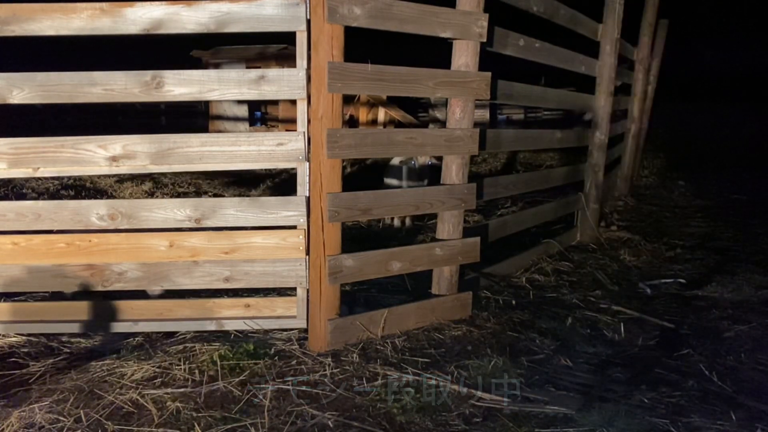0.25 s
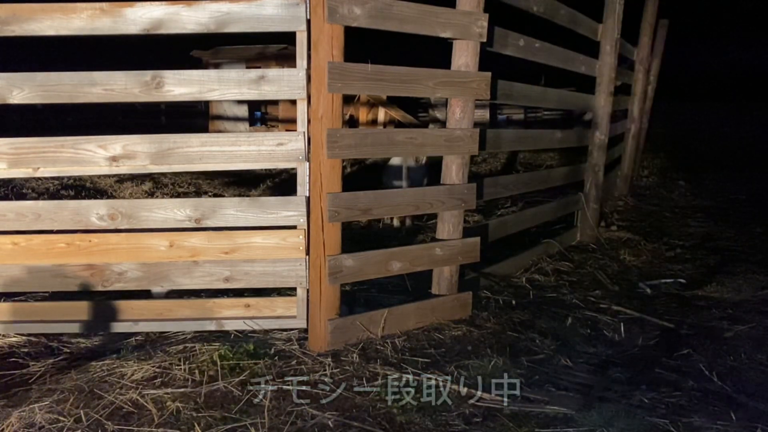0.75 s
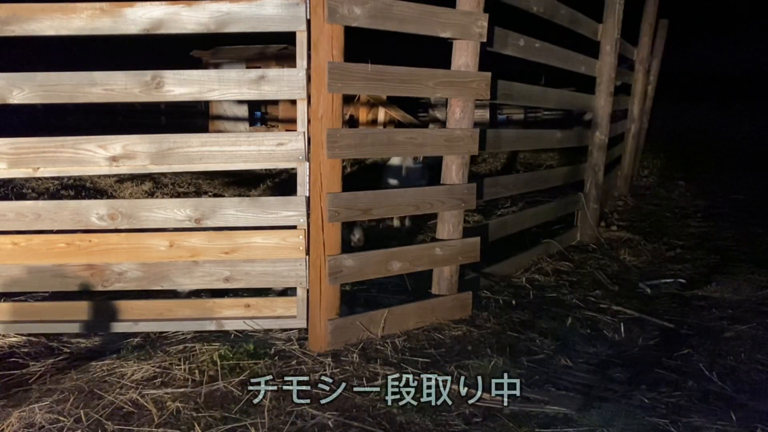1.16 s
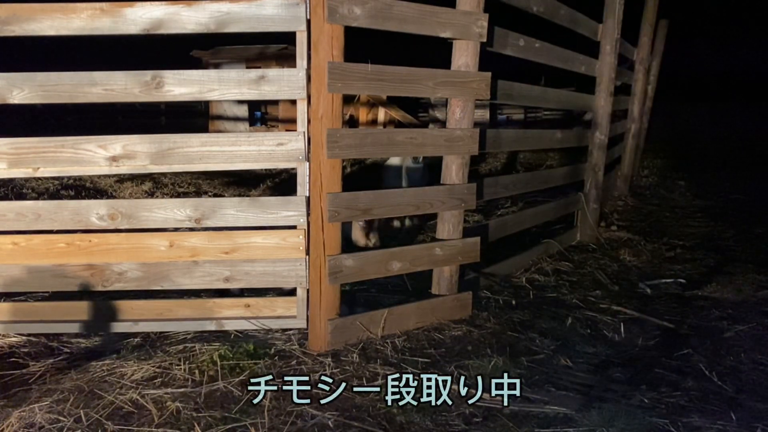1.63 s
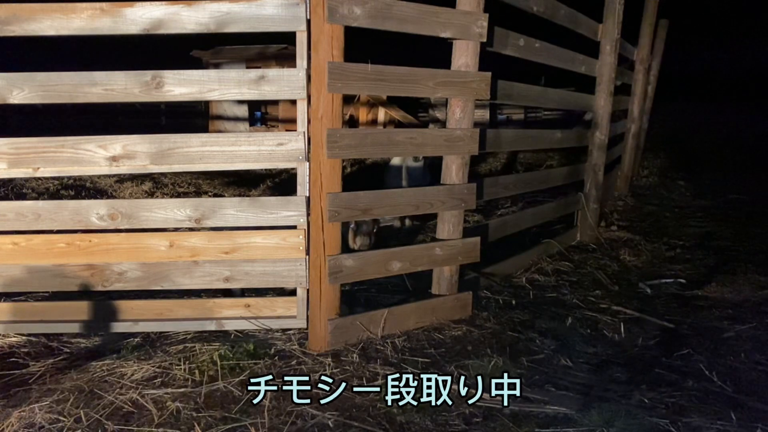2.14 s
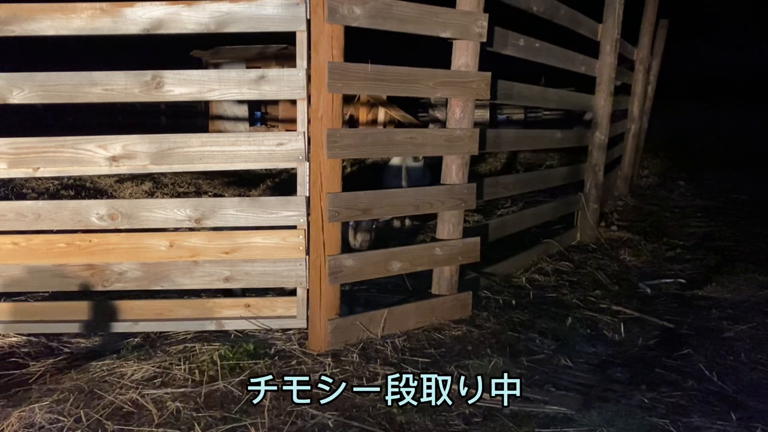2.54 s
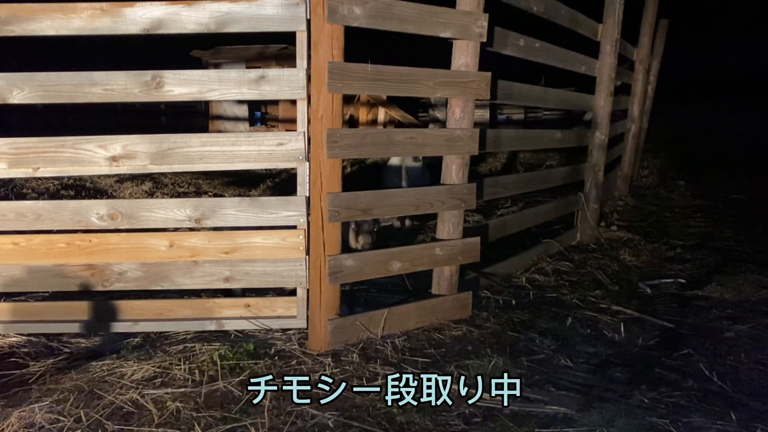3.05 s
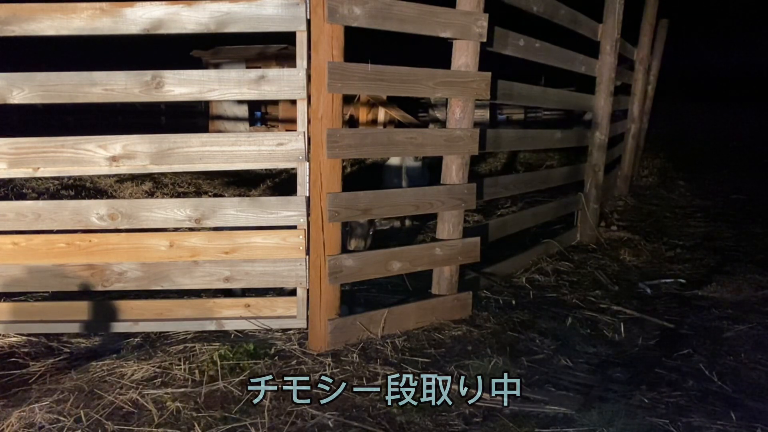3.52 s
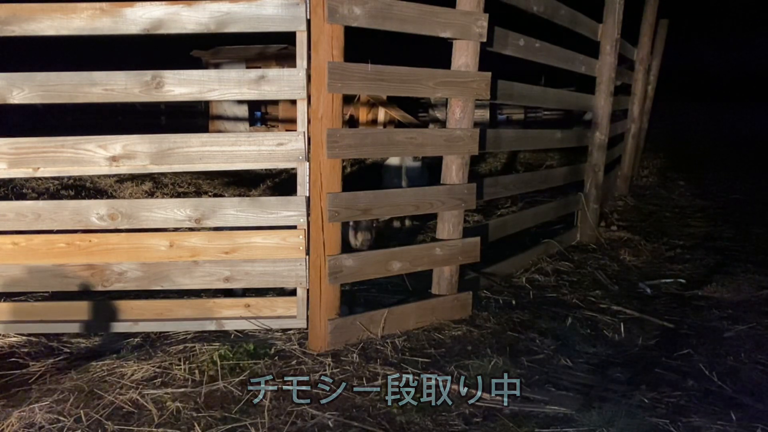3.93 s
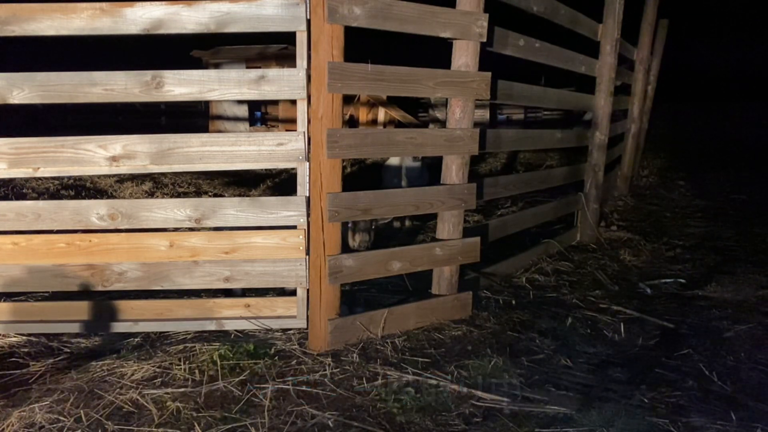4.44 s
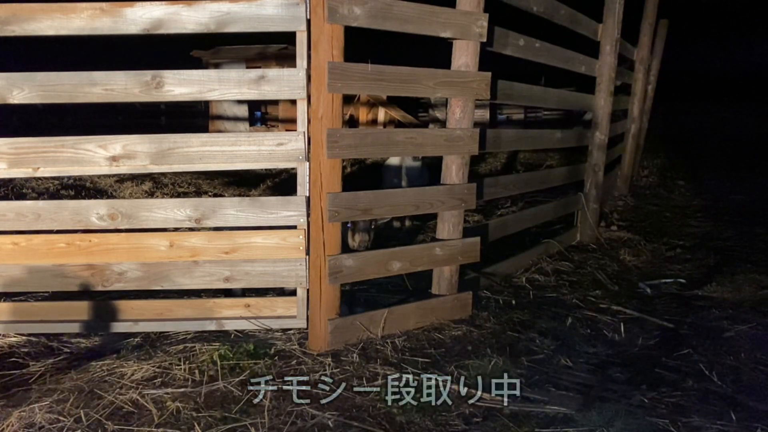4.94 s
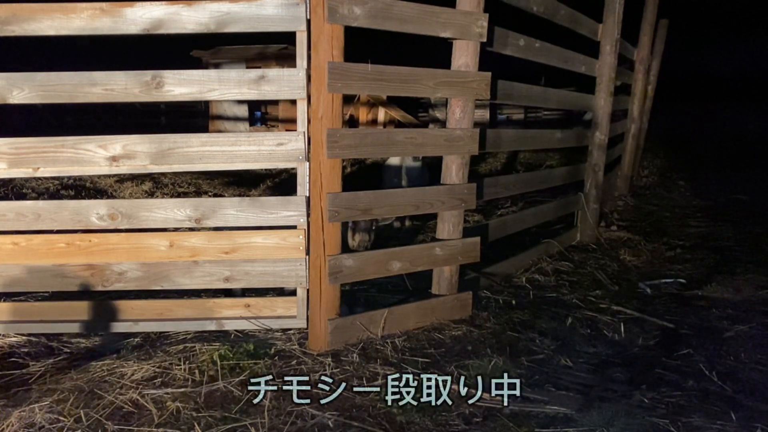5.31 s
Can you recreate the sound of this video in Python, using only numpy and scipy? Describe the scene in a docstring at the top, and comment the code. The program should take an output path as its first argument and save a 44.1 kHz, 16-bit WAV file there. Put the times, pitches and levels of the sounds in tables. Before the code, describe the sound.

A goat gives one short, loud, level bleat, then a softer quavering one, over a low engine hum and faint straw rustle.

```python
"""Open wooden goat pen at night: one loud, level bleat that sags at its end, then a softer quavering one,
nine throbs after a faint first push. Voices are vocal-fold harmonics and puffed noise shaped by a throat.
Straw under the animals is coloured noise with fine crackle; breaking stalks add cracks and dull knocks.
A far engine is a sum of cycle orders, over a bed of night air. Two close microphone ports pick it up."""
import sys
import numpy as np
from scipy import signal
from scipy.fft import rfft, irfft
from scipy.io import wavfile
from scipy.ndimage import uniform_filter1d, map_coordinates

SR = 44100
rng = np.random.default_rng(int(sys.argv[2]) if len(sys.argv) > 2 else 0)


def log_audio(samples):
    """Write samples as a 16-bit WAV file to the path given in sys.argv[1]."""
    # one column per channel
    frames = np.atleast_2d(samples).T
    # limit to full scale, then quantise
    limited = np.clip(frames, -1, 1)
    pcm = np.round(limited * 32767).astype(np.int16)
    wavfile.write(sys.argv[1], SR, pcm)


N = 246078
T = np.arange(N) / SR
EDGE_HZ = 15900  # upper band limit of harmonics and ports

# likeness of the noise at the two ports: (frequency [Hz], left-right correlation [-1 to 1])
AIR_SAME = [(60, 0.95), (200, 0.62), (400, 0.2), (700, 0.057), (1500, 0.6), (3000, 0.15), (7000, 0.65),
            (15000, 1)]


def gain_of(db):
    """Decibels to an amplitude factor."""
    return 10 ** (np.asarray(db) / 20)


def evened(x):
    """Scales to an rms of one."""
    return x / np.sqrt(np.mean(x ** 2) + 1e-20)


def read(points, hz):
    """Reads a spectrum on a log-frequency axis."""
    f, value = np.transpose(sorted(map(tuple, points)))
    return np.interp(np.log(hz + 1), np.log(f + 1), value)


def add(mix, s, sound):
    """Mixes a sound in at a time in seconds."""
    part = mix[max(round(s * SR), 0):][:len(sound)]
    part += sound[:len(part)]


def coloured(x, points):
    """Filters x by a gain curve in dB."""
    hz = np.fft.rfftfreq(x.shape[-1], 1 / SR)
    return irfft(rfft(x) * gain_of(read(points, hz)), x.shape[-1])


def leaned(pair, lean):
    """Tips a pair to the left or right, band by band."""
    return np.array([coloured(x, [(f, side * db / 2) for f, db in lean]) for x, side in zip(pair, (1, -1))])


def drift(size, hz):
    """Smooth random curve of about unit size, varying up to a rate."""
    knots = rng.standard_normal(4096)
    return map_coordinates(knots, [np.arange(size) * 2 * hz / SR], order=3, mode="wrap")


def port_pair(same):
    """Two noises, alike by a spectrum of likeness."""
    a, b = rfft(rng.standard_normal((2, N)))
    c = np.clip(read(same, np.fft.rfftfreq(N, 1 / SR)), -1, 1)
    return irfft(np.array([a, c * a + np.sqrt(1 - c ** 2) * b]), N)


def night_air(level_db=-55):
    """A low rumble and a faint wash: coloured noise that leans left or right by band."""
    # air spectrum: (frequency [Hz], density [dB per Hz])
    air_colour = [(20, -29), (42, 0), (60, -0.5), (110, -5.5), (200, -6.5), (250, -16), (375, -10),
                  (560, -20), (860, -17.5), (1100, -26.5), (1750, -19), (2800, -35.5), (6000, -44),
                  (15000, -61)]
    # side balance: (frequency [Hz], left minus right [dB])
    air_lean = [(100, 0.5), (500, 7.5), (900, -0.5), (1300, -4), (1900, -5), (3300, -7.5), (5000, 0.5),
                (9000, 3.5)]
    wash = coloured(port_pair(AIR_SAME), air_colour)
    return gain_of(level_db) * evened(leaned(wash, air_lean))


def straw(per_s=700, spread_db=4.0, crackle=0.59, catch_db=1):
    """A hiss of rubbing stalks that catch and slip, with random grains as fine crackle."""
    # rustle before the catch-and-slip drift: (time [s], level [dB])
    rustle = [(0.0, -62), (0.58, -64), (0.92, -70.5), (1.1, -74.5), (1.54, -68.5), (2.6, -66.5),
              (3.02, -70.5), (3.44, -65), (3.61, -58), (3.8, -65), (4.14, -65.5), (4.44, -61.5),
              (4.74, -70.5), (5.16, -74), (5.32, -59.5), (5.56, -61)]
    # straw spectrum: (frequency [Hz], density [dB per Hz])
    straw_colour = [(200, -12), (700, -2.5), (1500, 3.5), (2700, -6), (3800, 2.5), (6300, -1), (7300, -7),
                    (9000, -16), (12000, -14), (14500, -23.5), (15800, -35)]
    db = np.interp(T, *np.transpose(rustle)) + catch_db * drift(N, 22)
    hits = (rng.random(N) < per_s / SR) * rng.choice([-1, 1], N)
    grains = hits * gain_of(spread_db * np.minimum(rng.exponential(1, N), 5))
    sound = port_pair(AIR_SAME) + crackle * evened(grains)
    return gain_of(db) * evened(coloured(sound, straw_colour))


def engine(waver=0.0015, flutter=0.14):
    """Orders of a four-stroke cycle (two turns), settling to idle; the strong pair beats at the firing rate."""
    # engine orders at idle: (multiple of the cycle rate, rms level [dB])
    orders = [(6, -74), (9, -67.5), (12, -74), (15, -73), (18, -78.5), (21, -58.5), (22, -64), (23, -84),
              (24, -58.5), (25, -72.5), (26, -74), (45, -74), (53, -70.5)]
    idle_rpm, rev_rpm, rev_db, settle_s = 984, 68.4, 3.5, .48
    rev = np.exp(-(T / settle_s) ** 2)
    cycle_hz = (idle_rpm + rev_rpm * rev) / 120
    cycles = np.cumsum(cycle_hz * (1 + waver * drift(N, 2.98))) / SR
    out = np.zeros(N)
    for order, db in orders:
        strength = gain_of(db) * (1 + flutter * drift(N, 1.217))
        out += strength * np.sin(2 * np.pi * (round(order) * cycles + rng.random()))
    return gain_of(rev_db * rev) * np.sqrt(2) * out


def folds(hz, throat, jitter, spread):
    """Harmonics of the vocal folds, each weighted by the throat, at an even level; also the cycle count."""
    turns = np.cumsum(hz * (1 + jitter * drift(len(hz), 220))) / SR
    k = np.arange(1, 52)[:, None]
    weight = gain_of(throat(k * hz)) * (k * hz < EDGE_HZ)
    # phases spread by harmonic number plus a random part, so the tone is less peaky in each cycle
    phase = spread * k ** 2 + rng.normal(0, 0.72, k.shape)
    tone = (weight * np.cos(2 * np.pi * k * turns + phase)).sum(0)
    return tone / np.sqrt(uniform_filter1d(tone ** 2, size=440)), turns


def puffs(turns, steady):
    """Air noise that bursts once in every cycle, over a steady share."""
    return (steady + np.exp(-(turns % 1) / 0.33)) * rng.standard_normal(len(turns))


def loud_bleat(noise_db=-4.5, spread=.3):
    """A clean held note with a slow waver; as the mouth closes the pitch sags and the voice roughens."""
    # throat at four mouth positions, and the thin top they share: (frequency [Hz], gain [dB])
    early, wide = [(400, -9), (800, -24), (1210, -6), (1610, -1.5), (2010, -5), (2410, 2), (2810, -13.5),
                   (3220, -1.5), (3620, -26.5), (4020, -8.5), (4820, -22), (5220, -15.5), (6030, -29.5),
                   (6830, -25)], [(400, -9.5), (810, -13.5), (1210, -3.5), (2010, -7), (2420, -6),
                                  (2820, -14), (3220, 2), (3630, -5.5), (4030, -9), (4430, -24),
                                  (5240, -9.5), (5640, -33.5), (6040, -20), (6850, -36.5)]
    turning, closing = [(365, -9), (740, -29), (1100, -2.5), (1480, -7.5), (1850, -14), (2250, -0.5),
                        (2750, -23.5), (3150, -2), (3520, 0), (4000, -14), (4400, -18.5), (5300, -19),
                        (6800, -29)], [(320, -12), (650, -9), (970, -5.5), (1290, -5), (1620, 3),
                                         (1940, -28), (2260, -10), (2590, -20), (2910, -27), (3240, -9),
                                         (3560, -3), (4210, -15.5), (5180, -21.5), (6790, -29)]
    sheen = [(7300, -39.5), (8100, -50.5), (10000, -57.5), (11700, -46.5), (13400, -46), (14900, -40),
             (15800, -56)]
    # mouth: (time [s], position [0 early, 1 wide, 2 turning, 3 closing])
    mouth_path = [(.09, 0), (.175, 0.3), (.302, 1), (.326, 2), (.342, 2), (.351, 2.5)]
    start_s, stop_s, held_db = 0.048, 0.3715, -25.5
    attack_s, release_db_per_s = 0.014, 848
    held_hz, waver_hz, waver_period_s = 401.56, 1.98, .22
    sag_at_s, sag_ease_s, sag_hz, sag_db = .3465, 0.01097, 106.3, -3
    rough_held, rough_sag = .013, .11  # 0-1; the sag adds the second
    jitter_at_full_rough = .07  # share of pitch

    t = np.arange(start_s, stop_s + 0.064, 1 / SR)
    sag = 1 / (1 + np.exp((sag_at_s - t) / sag_ease_s))
    waver = waver_hz * np.cos(2 * np.pi * (t - t[0] - attack_s) / waver_period_s)
    hz = held_hz + waver - sag_hz * sag
    db = held_db + sag_db * sag - release_db_per_s * np.maximum(t - stop_s, 0)
    attack = np.minimum((t - t[0]) / attack_s, 1)
    rough = rough_held + rough_sag * sag

    mouth = np.interp(t, *np.transpose(mouth_path))
    throats = [list(shape) + list(sheen) for shape in (early, wide, turning, closing)]
    shares = [np.interp(mouth, range(len(throats)), row) for row in np.eye(len(throats))]

    def throat(f):
        """Throat gain in dB, blended between mouth positions."""
        return sum(w * read(p, f) for w, p in zip(shares, throats))

    tone, turns = folds(hz, throat, jitter_at_full_rough * rough, spread)
    air = puffs(turns, steady=.3)
    air = sum(w * evened(coloured(air, p)) for w, p in zip(shares, throats))
    voice = tone + gain_of(noise_db) * rough * air
    return t[0], attack * gain_of(db) * voice * signal.windows.tukey(len(t), .02)


def pen(x, wet_db):
    """A few echoes off ground and fence, then a faint tail from the shed and yard."""
    # tail decay: (frequency [Hz], t60 [s])
    tail_t60 = [(200, 0.9), (1000, 1.85), (2400, 1.36), (3200, 0.68), (4000, 0.83), (8000, 0.7),
                (15000, 0.5)]
    # tail colour: (frequency [Hz], gain [dB])
    tail_colour = [(300, -3.5), (1600, -10), (2400, 1.5), (2800, 14), (3200, 1.5), (3650, -5.5),
                   (5000, -0.5), (12000, -1.5)]
    # early echoes: (delay [s], level [dB])
    boards = [(.0043, -37.5), (.0091, -23), (0.0174, -32), (0.026, -28.5)]
    taps = rng.standard_normal((2, SR)) * (rng.random((2, SR)) < .1)
    hz, t, z = signal.stft(taps, SR, nperseg=256)
    decay_db = -60 * t / read(tail_t60, hz)[:, None]
    z = z * gain_of(read(tail_colour, hz)[:, None] + decay_db) * np.minimum(t / 0.014, 1)
    tail = signal.istft(z, SR, nperseg=256)[1]
    tail *= gain_of(wet_db) / np.linalg.norm(tail[0])
    for delay_s, db in boards:
        tail[:, round(delay_s * SR)] += gain_of(db)
    return x + signal.fftconvolve(x[None], tail, axes=1)[:, :N]


def throb(s, db, top_hz, length, jitter=0.029, chest_db=7, spread=0.051, vary_db=2.0, level_db=-2.5):
    """One push of the quaver: the folds tighten and go slack, so pitch and brightness arch, with noisy edges."""
    # throat at both mouth positions, and what they share: (frequency [Hz], gain [dB])
    bright, soft = [(400, 1.5), (800, -5), (1200, -0.5), (1600, -5.5), (2000, -22), (2400, -15.5),
                    (3200, -22.5), (4000, -10.5), (4400, -22), (5600, -11.5), (6800, -11.5), (8400, -10)], [(400, 3), (800, 0.5), (1200, 8.5), (1600, -4), (2000, -20),
                                    (2400, -10.5), (3200, -24), (3600, -6.5), (4000, -6), (4400, -19.5),
                                    (5200, -2.5), (6000, -18), (6800, -9.5), (8400, -14.5)]
    shared = [(560, -22), (9400, -18), (10200, -18), (10900, -30), (11700, -26), (13200, -37), (14300, -32),
              (15500, -42)]
    attack_s, hold_s, release_s, fade_db = .029, 0.011, .028, -15  # times at length 1
    start_share = 0.18  # of full strength, where it breaks in
    scoop, drop = 0.15, .36  # shares of the top pitch
    tense_rough, slack_rough = 0.26, 1.9  # roughness 0-1; the second per share of pitch lost
    tense_bright_db, slack_dull_db = 4.5, -24  # the second per share of pitch lost
    start_dull_db, end_dull_db = -3.5, -4.5  # the treble comes in last and leaves first
    relax_from_s, relax_s = 1.74, 0.19  # the mouth goes from bright to soft
    full_effort_db, weak_chest = -40, 0.75  # a weak push gains fundamental, dB per dB below full

    t = np.arange(-attack_s * length, (hold_s + release_s) * length, 1 / SR)
    before = np.clip(-t / length / attack_s, 0, 1)
    after = np.clip((t / length - hold_s) / release_s, 0, 1)
    slack = scoop * before ** 2 + drop * after
    swell = (1 - (1 - start_share) * before ** 1.08) * gain_of(level_db + fade_db * after)
    rough = np.clip(tense_rough + slack_rough * slack, 0, 1)
    bright_db = tense_bright_db + slack_dull_db * slack
    bright_db = bright_db + start_dull_db * before + end_dull_db * np.sqrt(after)

    mouth = np.exp(-max(s - relax_from_s, 0) / relax_s)
    grid = np.arange(200, 16000, 100)
    colour = mouth * read(list(bright) + list(shared), grid)
    colour += (1 - mouth) * read(list(soft) + list(shared), grid)
    # the throat is never set quite the same way twice
    ripple = evened(uniform_filter1d(rng.standard_normal(len(grid)), size=6))
    colour += vary_db * np.minimum(grid / 4000, 1) * ripple
    throat = np.column_stack([grid, colour])
    chest = chest_db * np.clip(t / 0.018, -1, 1)  # the fundamental lingers as the push dies
    chest = chest + weak_chest * max(full_effort_db - db, 0)

    def shape(f):
        """Throat gain in dB, with moving treble and fundamental."""
        return read(throat, f) + bright_db * np.clip((f - 1500) / 2000, 0, 1) + chest * (f < 480)

    tone, turns = folds(top_hz * (1 - slack), shape, jitter * rough, spread)
    air = evened(coloured(puffs(turns, steady=0.31), throat))
    dull = coloured(air, [(1500, 0), (3500, -40)])
    air = dull + gain_of(bright_db) * (air - dull)
    voice = np.sqrt(1 - rough ** 2) * tone + rough * air
    return s + t[0], gain_of(db) * swell * voice * signal.windows.tukey(len(t), .06)


def snaps(level_db=-2, t60_s=0.03):
    """The loudest stalks break: a bright decaying noise crack and a short dull knock of ringing modes."""
    # (time [s], crack onset [dB before level_db], knock re crack [dB], ring time [factor])
    breaks = [(3.928, -53, -18, 1.3), (3.995, -51.5, -18, 1), (4.290, -53.5, 2, 1.2), (4.424, -66, 11, 2.2),
              (4.566, -55, -7, 1), (5.264, -55, -18, 1)]
    # knock modes before random detuning and ring factor: (frequency [Hz], level [dB], t60 [s])
    stalk_modes = [(1600, 0, .035), (1950, -1, .02), (2350, -3, .015), (3300, -1, .02)]
    # crack spectrum: (frequency [Hz], density [dB per Hz])
    crack_colour = [(500, -12), (3500, 0), (7000, 0), (11000, -4), (14000, -7), (15500, -12)]
    out, t = np.zeros(N), np.arange(4096) / SR
    for s, db, knock_db, ring in breaks:
        crack = evened(coloured(rng.standard_normal(len(t)), crack_colour))
        crack = crack * gain_of(-60 * t / (t60_s * ring))
        knock = np.zeros(len(t))
        for hz, mode_db, mode_t60_s in stalk_modes:
            decay = gain_of(mode_db - 60 * t / (mode_t60_s * ring))
            knock += decay * np.sin(2 * np.pi * hz * rng.uniform(0.96, 1.05) * t)
        add(out, s, gain_of(db + level_db) * (crack + gain_of(knock_db) * knock))
    return out


def scene():
    """Both bleats a little to the left, over straw, engine and air."""
    # quaver, a row a throb: (middle [s], level [dB before level_db], top pitch [Hz], length [factor])
    throbs = [(1.645, -52.5, 301, 0.87), (1.742, -39.5, 400, 0.74), (1.839, -39, 398, 0.88),
              (1.934, -40, 397.4, 0.97), (2.026, -40.5, 401, 1), (2.116, -40, 402.3, 0.96),
              (2.208, -40, 405.3, 0.92), (2.301, -40.5, 403.4, 0.88), (2.397, -41, 399, 0.82),
              (2.495, -42, 388.3, 0.91)]
    # the goats' side balance: (frequency [Hz], left minus right [dB])
    goat_lean = [(400, 1.9), (1200, 1.5), (2000, 2), (2400, -0.5), (2800, 4.5), (3200, 3), (3700, 4),
                 (5000, 2.5), (8000, 1.5), (9000, 0.5)]
    loud, quaver = np.zeros(N), np.zeros(N)
    add(loud, *loud_bleat())
    for row in throbs:
        add(quaver, *throb(*row))
    goats = leaned(pen(loud, wet_db=-27) + pen(quaver, wet_db=-15.5), goat_lean)
    engine_pair = engine() * gain_of([[.6], [-.6]])  # dB left, right
    return goats + snaps() + straw() + night_air() + engine_pair


def record(dry):
    """The two ports drift apart in phase in the treble; then the band limit."""
    # phase between the ports: (frequency [Hz], left lead [rad])
    port_lead = [(0, 0), (1000, .1), (2000, .3), (2450, .7), (2800, -.3), (3200, .65), (3800, .15),
                 (7200, 0), (9050, -3.14), (10700, -6.2), (11500, -6.4), (13200, -9.4), (14800, -12.5)]
    lead = np.interp(np.fft.rfftfreq(N, 1 / SR), *np.transpose(port_lead))
    pair = irfft(rfft(dry) * np.exp(.5j * lead * np.array([[1], [-1]])), N)
    band_limit = signal.firwin(511, EDGE_HZ, window=("kaiser", 9), fs=SR)
    return signal.oaconvolve(pair, band_limit[None], "same")


dry = scene()
out = record(dry)
log_audio(out)
```